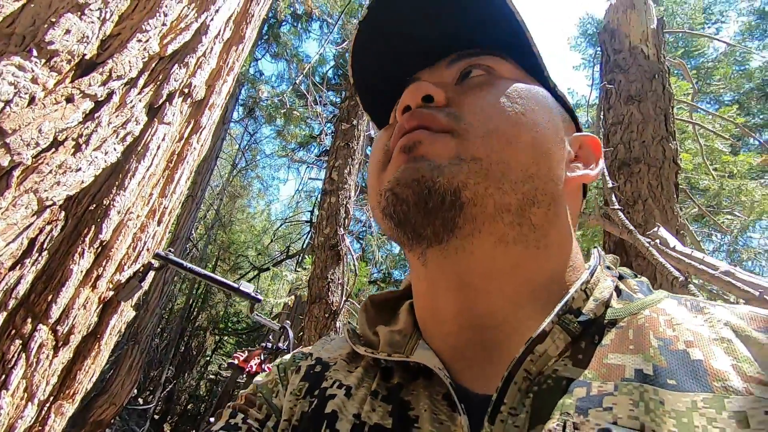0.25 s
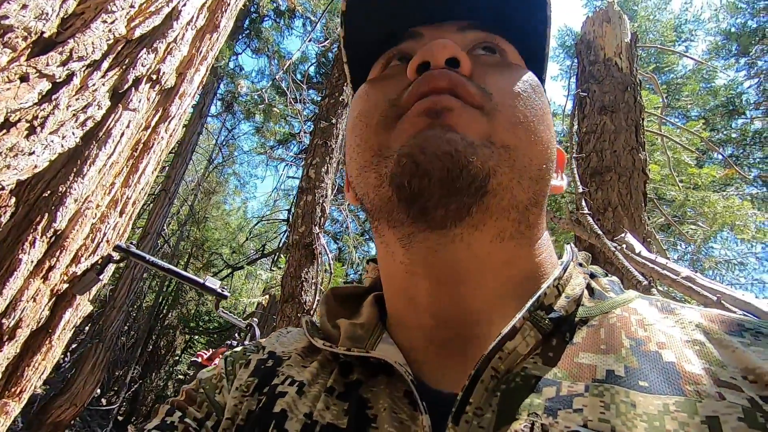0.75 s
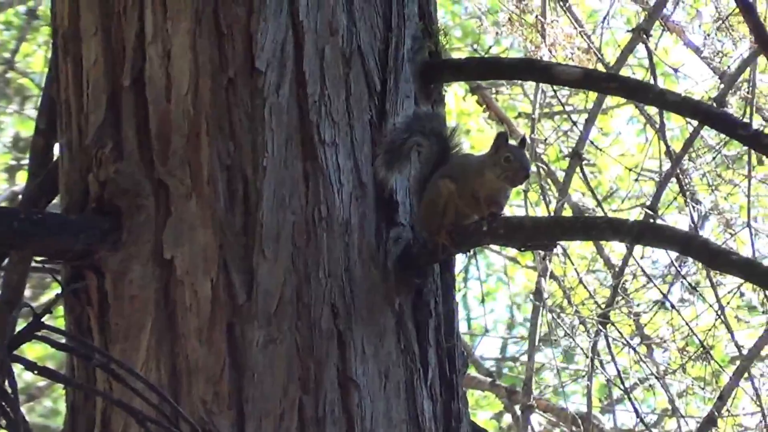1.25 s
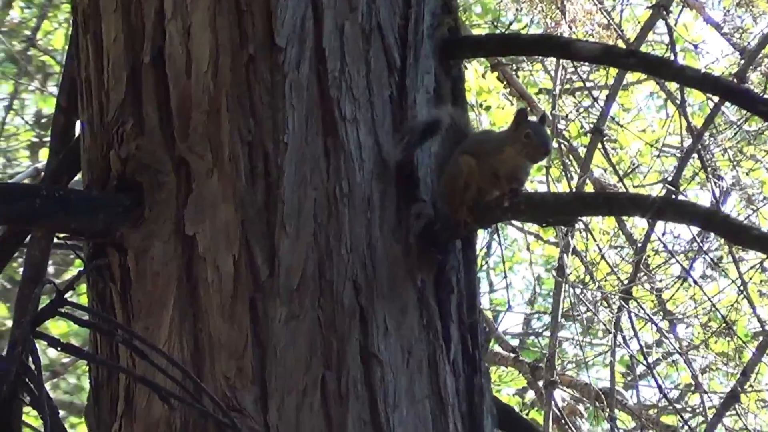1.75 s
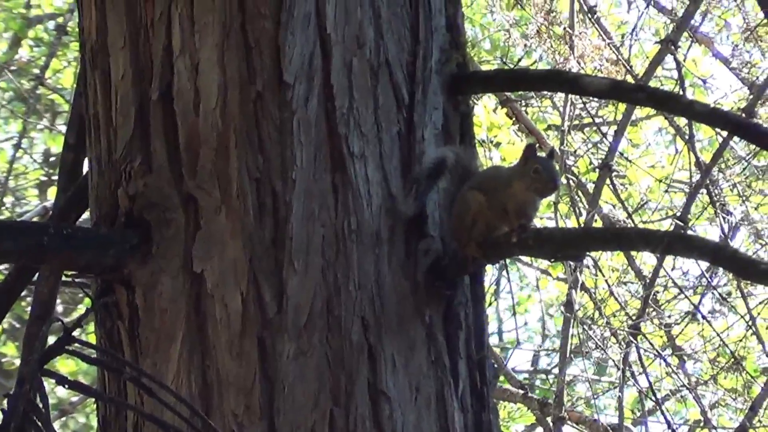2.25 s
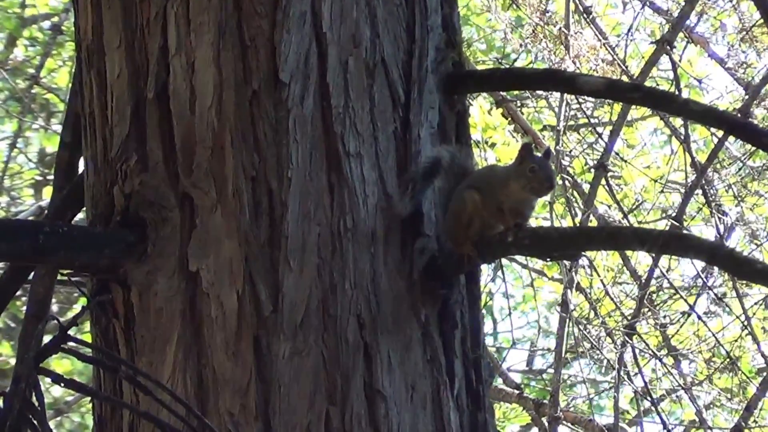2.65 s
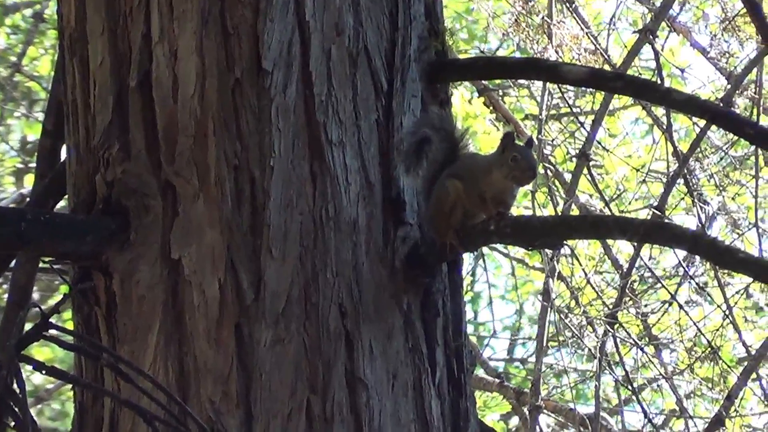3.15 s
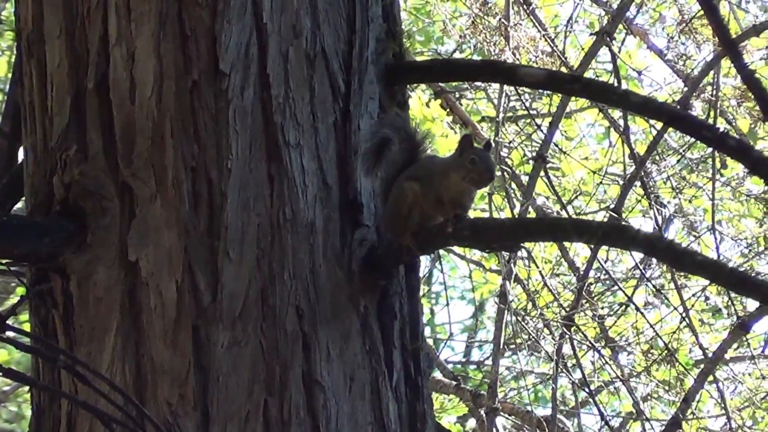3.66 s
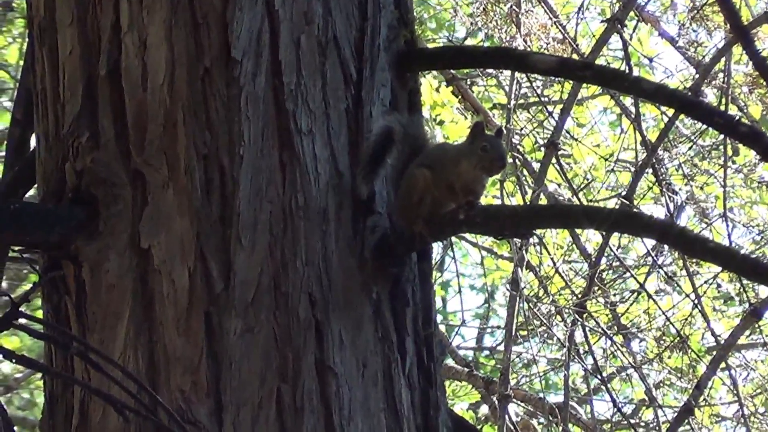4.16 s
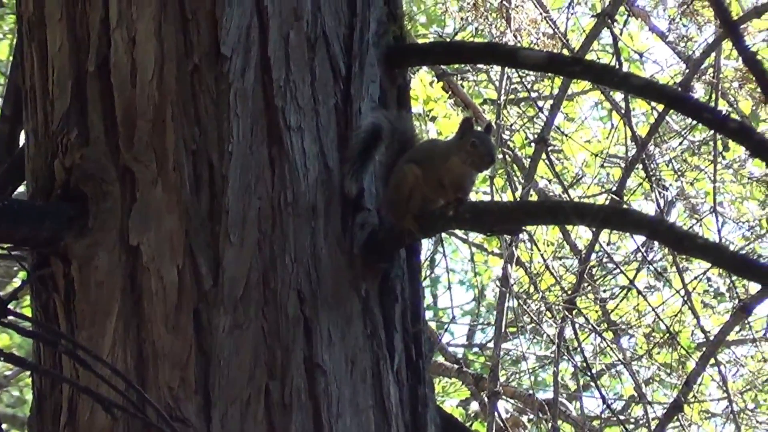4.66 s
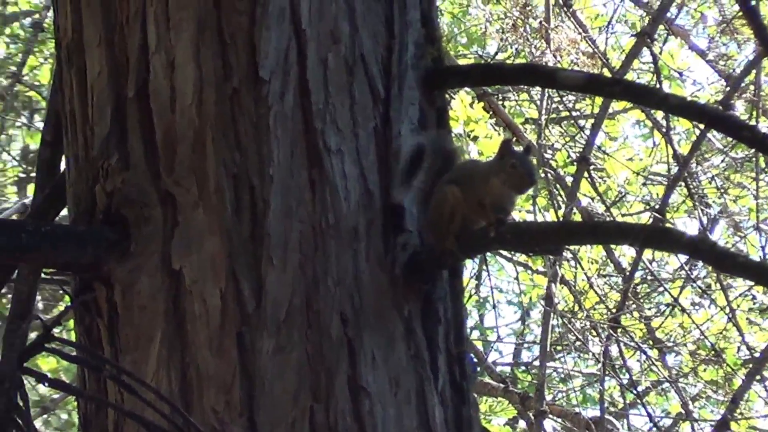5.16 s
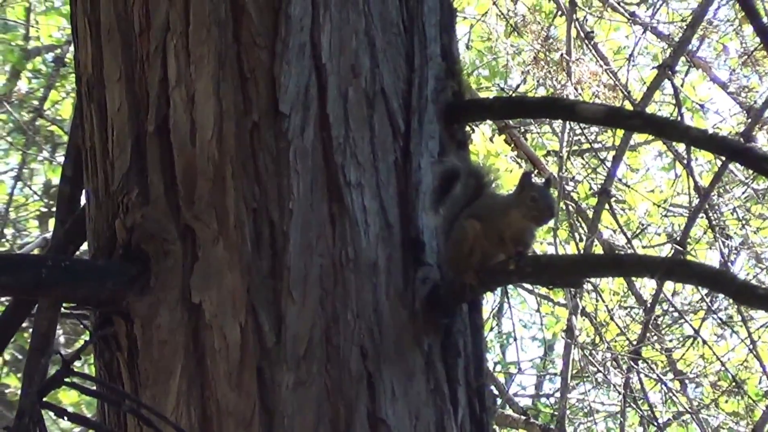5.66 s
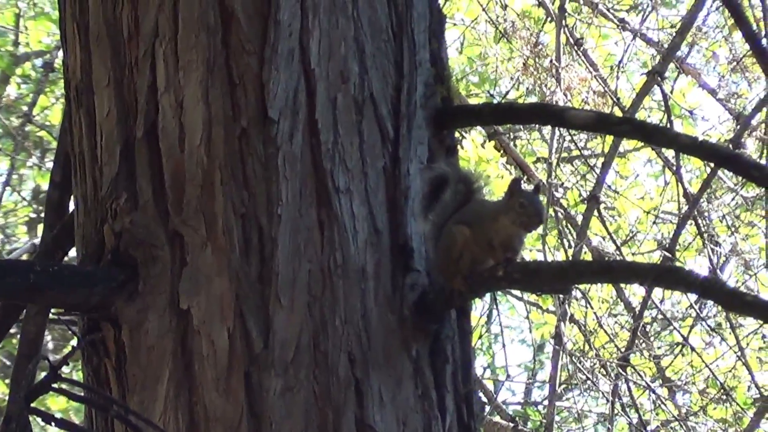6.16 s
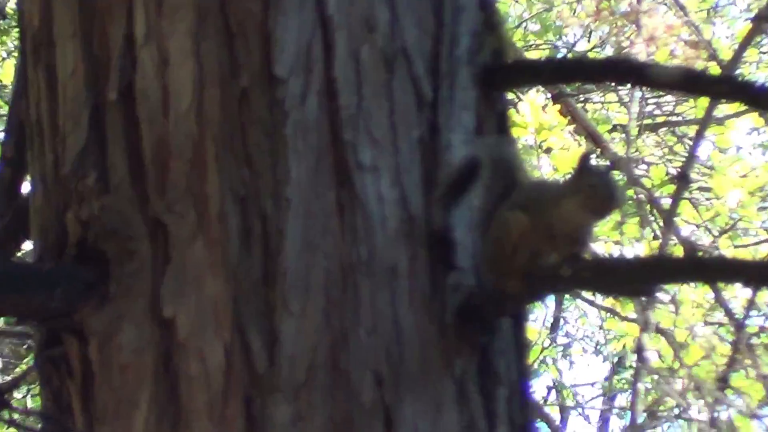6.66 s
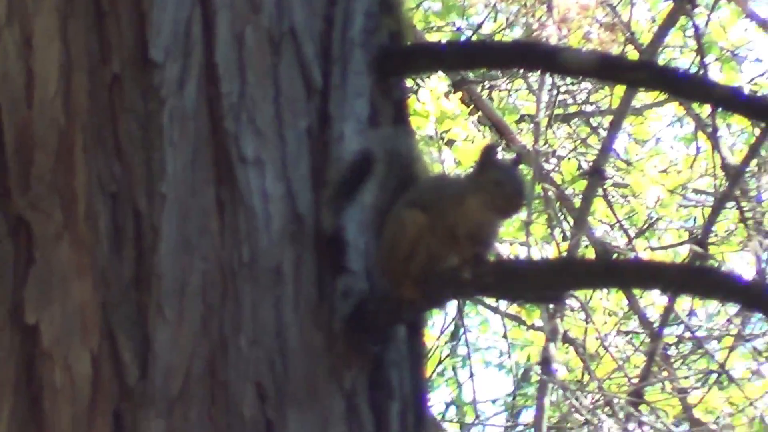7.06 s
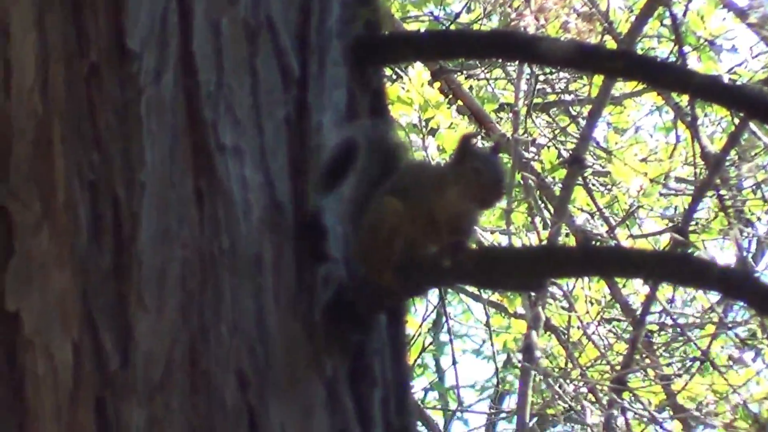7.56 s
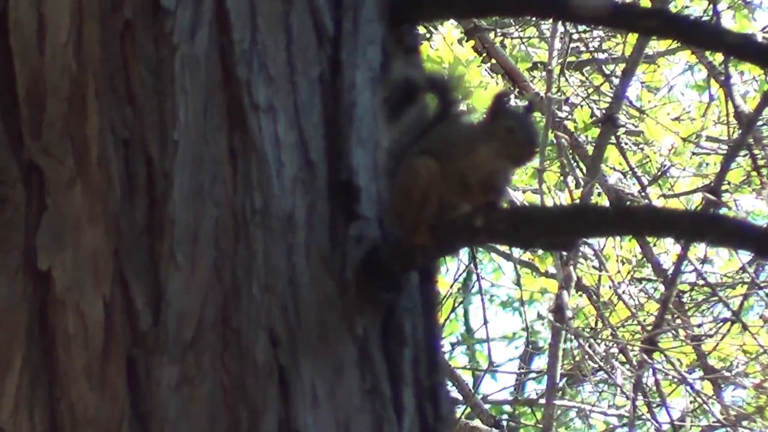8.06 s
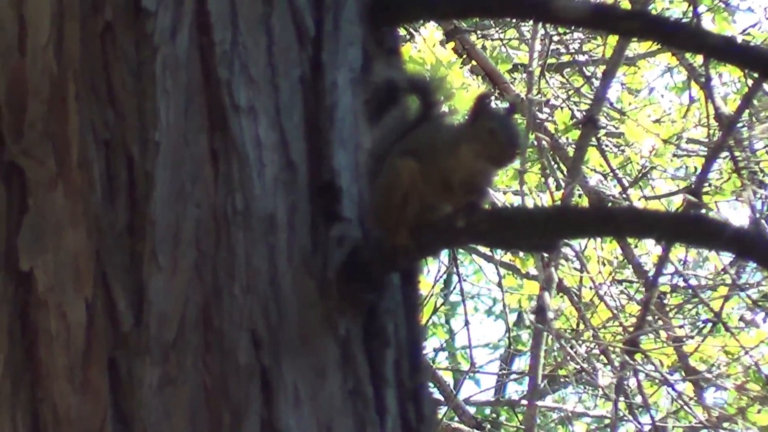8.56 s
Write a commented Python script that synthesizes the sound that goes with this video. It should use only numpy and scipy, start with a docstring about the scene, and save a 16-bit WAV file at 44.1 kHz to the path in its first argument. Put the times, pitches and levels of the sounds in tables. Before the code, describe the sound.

Very close, loud handling opens: cloth rubbing, plastic snaps and rapid stick-slip creaks in wide stereo. After about one second everything drops to quiet woods, with low airy murmur, electronic whine and a briefly fading hum. Evenly spaced squirrel chirps stand out, rasping at the onset, rising quickly and falling away into echo among trunks. Sparse high bird chips, light ticks and finger rubs on the camera surround them; hiss swells in the trees last.

```python
"""First a sleeve swishes over a hand-held camera and the grip snaps and creaks: cloth noise and
sudden slips ring the case. Then the scene cuts to a quiet forest of soft air noise, where the camera
whines thinly, hums briefly and ticks in the hand. A squirrel scolds with six sharp chirps built from
harmonics and breath noise, each sinking to a faint whistle. Small birds chip now and then on two
gliding tones. Close to the end a hiss swells in the trees."""
import sys
import numpy as np
from scipy import signal
from scipy.fft import next_fast_len
from scipy.io import wavfile

SR = 44100
rng = np.random.default_rng(int(sys.argv[2]) if len(sys.argv) > 2 else 0)


def file_out(sig):
    """Save sig as 16-bit WAV at sys.argv[1]."""
    # one column per channel
    cols = np.atleast_2d(sig).T
    # limit, then scale
    lim = np.clip(cols, -1, 1)
    pcm = np.round(lim * 32767).astype(np.int16)
    wavfile.write(sys.argv[1], SR, pcm)


N = 388521
TIME = np.arange(N) / SR
CUT_S = 1.075   # the handling gives way to the forest

# strokes of cloth over the case: [start t/s, end t/s, final level/dB, swell on the way/dB,
# brightness/dB, pressure/dB, catching/dB]
STROKES = [(0, 0.11, -31.5, -0.5, 0.5, 6.5, -1.5), (0.081, 0.213, -16, 14.5, 5, 5, 1.5),
           (0.229, 0.45, -21.5, 34, 0, 7.5, 1), (0.443, 0.698, -38.5, 1.5, -3, 6.5, 1),
           (0.707, 0.756, -27, -3.5, -6.5, -8, -0.5), (.77, 0.81, -53, -11, -16, -13, 0),
           (0.808, 1.03, -31.5, 10.5, -20, -13, 3.5), (1.015, 1.032, -18.5, 1, -11, -3, -4)]
# noise shape of the cloth: [f/Hz, level per Hz/dB]
CLOTH_SPECTRUM = [(250, -23), (450, -32), (750, -19.5), (1150, -1.5), (1500, 4), (1950, -1), (2500, -5.5),
                  (3300, -1.5), (4700, -7), (6500, -6.5), (9000, -10), (11000, -19.5), (15500, -22)]
# what rubbing excites in the case: [f/Hz, width f/Hz, level/dB]
RUB_MODES = [(1120, 460, 1), (1910, 460, 2)]
# the case flexing in the hand: [t/s, rumble level/dB]
FLEXING = [(0, -40.5), (.14, -59), (.235, -51.5), (.33, -55), (.46, -37), (.72, -31.5), (.8, -43.5),
           (.9, -31), (1.036, -23), (1.055, -76)]
# noise shape of that rumble: [f/Hz, level per Hz/dB]
RUMBLE_SPECTRUM = [(15, -37), (25, -1), (85, -3), (110, -11), (150, 4.5), (200, -1), (300, -11.5),
                   (460, -13), (700, -14.5), (910, -48)]
# stereo width of the handling: [f/Hz, side against mid level/dB]
HANDLING_SIDE = [(60, 2), (200, -9), (400, 2), (750, 6), (1400, 5.5), (2400, -8), (4400, -3), (8000, 1.5),
                 (15000, -7)]
# single snaps of the grip, before the case colours them: [t/s, peak level/dB, bass level/dB, treble level/dB]
SNAPS = [(.218, -9, -15, 9), (.362, -18.5, -6.5, -2), (.477, -12, -13.5, -7), (.677, -13, -22, -21),
         (.711, -16, -18, -0.5), (.763, -16, -7.5, -30), (.788, -25.5, -12, -40), (1.018, -12.5, -12, -28),
         (1.029, -5, -9.5, -4.5)]
# creaks, runs of nearly even slips: [start t/s, end t/s, gap t/s, first peak level/dB,
# growth per second/dB, bass level/dB, treble level/dB, centre f/Hz]
CREAKS = [(0.495, .525, 0.022, -24, -100, -5, -8, 1400), (0.547, .63, .0345, -17.5, 6, -13, -19, 1390),
          (.819, .92, .0192, -16, -42, -4.5, -32, 2700), (.933, 1.01, 0.022, -14.5, 6, -6, -45, 2700)]
# what a slip rings in the case: [f/Hz, width f/Hz, level/dB]
GRIP_MODES = [(142, 170, 4), (201.6, 140, 1.5), (640, 960, -5), (1150, 410, -2.5), (1660, 190, -1),
              (2510, 250, 1.5), (3030, 230, -1.5), (4070, 380, -4), (5000, 530, 2.5), (8800, 3300, 0.5)]
# noise shape of the forest air: [f/Hz, level per Hz/dB]
AIR_SPECTRUM = [(15, -42), (25, -12), (54, -2.5), (85, -2), (157, -0.5), (446, -2.5), (577, -5),
                (1130, -7.5), (2800, -13.5), (3640, -70), (6160, -120)]
# noise shape of the steady hiss: [f/Hz, level per Hz/dB]
HISS_SPECTRUM = [(1500, -7.5), (2800, 0), (6000, 0), (7500, -4), (11000, -4.5), (15500, -9)]
# stereo width of air, hiss and rubs: [f/Hz, side against mid level/dB]
AIR_SIDE = [(60, -16), (200, -3.5), (380, -0.5), (700, 3.5), (1300, 3), (2400, -1.5), (4400, -1.5),
            (8000, -4), (15000, -21)]
# whine of the camera once it has built up, before WHINE_DB: [f/Hz, nominal width f/Hz, level/dB]
WHINE_BANDS = [(3320, 79, -72.5), (3504, 134, -61), (4436, 120, -66), (4850, 52, -71.5), (5730, 110, -75.5)]
# steady tones of its electronics: [f/Hz, level/dB]
TONES = [(11832, -80), (15735, -67.5)]
# ticks and knocks of its body, before the final lift: [t/s, peak level/dB, bass level/dB, treble level/dB]
TICKS = [(1.261, -43, -19, -0.5), (2.006, -35.5, -15.5, -3), (2.26, -39, -35, -2),
         (2.47, -20.5, -12.5, -23), (3.116, -35.5, -14, -13.5), (3.374, -39, -30, -26),
         (3.428, -36.5, -53, -11.5), (3.93, -33, -22, -10), (4.207, -44, -26, 1),
         (4.46, -39.5, -22.5, -0.5), (5.177, -33.5, -26, -15), (5.226, -35, -7, -19.5),
         (5.809, -35, -12, -19), (5.97, -34.5, -13, -19), (6.961, -41, -5, -0.5), (7.16, -33.5, -21, -3),
         (7.701, -38.5, -29, -14), (8.025, -44.5, -27, -16)]
# what a tick or knock rings: [f/Hz, width f/Hz, level/dB]
BODY_MODES = [(131, 140, -19), (377, 57, -4), (549, 23, -2.5), (877, 54, -3.5), (1119, 78, -1.5),
              (1336, 130, -6), (1670, 120, -6), (2100, 380, 0), (2490, 170, -3.5), (3230, 1500, -4),
              (3970, 1120, -2), (6000, 680, -5), (7950, 3000, -13)]
# stereo width of the ticks: [f/Hz, side against mid level/dB]
BODY_SIDE = [(60, -7.5), (180, -11), (550, -10), (1650, -16), (4970, -10), (15000, -4)]
# soft rubs of the fingers: [middle t/s, half length t/s, level/dB]
RUBS = [(2.275, 0.063, -58), (3.155, .05, -58.5), (6.679, .25, -54.5)]
# noise shape of rubbing skin: [f/Hz, level per Hz/dB]
SKIN_SPECTRUM = [(200, -11), (420, -28), (560, 4), (760, -10), (1250, 5), (2000, -23), (3000, 2),
                 (6000, -9), (12000, -18)]
# squirrel chirps: [t/s, level/dB, pitch ratio, length ratio, brightness per octave/dB]
CHIRPS = [(1.544, -38.5, 0.98, 1.1, -1), (2.742, -38.5, 0.99, 1.08, -0.5), (3.902, -38, 0.99, 1.16, -0.8),
          (5.238, -38.5, 0.99, 1.02, 0.4), (6.439, -38.5, .997, 1.0, 0.1), (7.645, -39, 0.99, 1.09, -0.5)]
# the squirrel's throat and mouth: [f/Hz, level/dB]
THROAT = [(1400, 0.5), (2000, -1), (3700, -11.5), (4200, 2.5), (5400, -4), (5900, 3), (6350, -15),
          (7700, -5), (8500, -16.5), (9600, 4.5), (10400, -3), (11300, -15), (12300, -16), (14500, -25)]
# bird chips, near and far: [t/s, level/dB, pitch ratio]
CHIPS = [(2.294, -41, 1.07), (3.14, -53, 1.15), (4.87, -57, 1.2), (5.72, -55.5, 1.13), (7.361, -54, 1.0),
         (8.581, -39.5, 1.01)]
# course of one chip: [t/s after its start, pitch f/Hz before the ratio, level/dB]
CHIP_SHAPE = [(0, 5600, -15), (.006, 6690, -1.5), (.014, 7130, -13.5), (.025, 7150, -12), (.045, 7070, -28)]
# noise shape of the swelling hiss: [f/Hz, level per Hz/dB]
SWELL_SPECTRUM = [(1000, -12), (2300, -2.5), (4000, -1), (5000, 3.5), (7000, -19), (11000, -15)]

# cloth and grip
STROKE_ATTACK_S, STROKE_RELEASE_DB_PER_S, CATCHES_PER_S = 0.00078, 1800, 240
BRIGHTENING = 0.096   # dB of extra fibre hiss for each dB that a stroke swells
SNAP_CENTRE_HZ = 1520   # where the case answers a snap most strongly
SLIP_JITTER_S, SLIP_SPREAD_DB = 0.0004, 1.5
# forest air
AIR_DB, HISS_DB = -59.5, -61
# camera
WHINE_DB, WHINE_SETTLE_S = -0.47, 0.81   # the whine builds up after the cut
SCAN_PER_S, SCAN_GAP_SHARE = 59.94, 0.07   # the tones drop out briefly on every picture scan
HUM_HZ, HUM_DB, HUM_S = 113, -67.5, 1   # a low hum dies away after the cut
# the skin catches during the longest rub
CRACKLE_COUNT, CRACKLE_DB, CRACKLE_BASS_DB, CRACKLE_TREBLE_DB = 9, -44, -8.5, -11
# ticks with more treble ring at a higher centre; this is the centre at 0 dB treble
TICK_CENTRE_HZ, TREBLE_DB_PER_OCTAVE = 2800, 12.5
# squirrel, before each chirp's own ratios: the pitch climbs to the top, then relaxes after the break
START_HZ, TOP_HZ, REST_HZ = 1787, 2100, 1290
CLIMB_S, CLIMB_CURVE, BREAK_S, RELAX_S = 0.037, 0.659, 0.039, 0.09
# effort opens fast, sags while the squeak is held, collapses at the break and leaves a whistle
ATTACK_S, ATTACK_DB, SAG_DB_PER_S, COLLAPSE_DB_PER_S = 0.013, 12, 143, 650
WHISTLE_DB, WHISTLE_S, WHISTLE_FADE_DB_PER_S = -23, 0.182, 600
RASP_DB, RASP_CLEARS_S, HELD_RASP_DB = 4, 0.0037, -14   # breathy at the onset, nearly clean after it
# swelling hiss in the trees, and the top of the recorded range
SWELL_S, SWELL_RISE_S, SWELL_DB = 8.58, 0.074, -53
CUTOFF_HZ = 15800


def from_db(db):
    """Turn decibels into gain."""
    return 10 ** (np.asarray(db) / 20)


def rms_one(x):
    """Scale a sound to an average (rms) strength of 1."""
    return x / np.sqrt(np.mean(x ** 2) + 1e-20)


def along(rows, t):
    """Read each column of a curve at times t."""
    s, *columns = np.transpose(rows)
    return [np.interp(t, s, c) for c in columns]


def at_hz(points, hz):
    """Read a spectrum on a log-frequency axis, as ears space pitch."""
    point_hz, level_db = np.array(points).T
    return np.interp(np.log(hz), np.log(point_hz), level_db)


def add(out, s, sound):
    """Mix a sound in at time s."""
    i = int(s * SR)
    out[..., i:i + sound.shape[-1]] += sound[..., :N - i]


def wobble(t, rate):
    """Random wandering around 0 with a spread of roughly 1, given rate new targets a second."""
    return np.interp(t * rate, np.arange(8192), rng.standard_normal(8192))


def resonate(x, hz, width):
    """Ring like a struck object: a two-pole resonance with gain about 1 at its peak."""
    r = np.exp(-np.pi * abs(width) / SR)
    feed = np.array([1, 0, -1]) * (1 - r * r) / 2
    feedback = [1, -2 * r * np.cos(2 * np.pi * hz / SR), r * r]
    return signal.lfilter(feed, feedback, x + 1e-18)


def butter(x, order, hz, kind="low"):
    """Keep only part of the frequency range, with smooth edges."""
    return signal.sosfilt(signal.butter(order, hz, kind, fs=SR, output="sos"), x)


def sine(hz):
    """A steady pure tone of rms 1."""
    return np.sqrt(2) * np.sin(2 * np.pi * hz * TIME)


def stereo(pair, side_db):
    """Make left and right from a mid and a side signal."""
    side = from_db(side_db) * pair[1]
    return np.array([pair[0] + side, pair[0] - side])


def noise(spectrum, sides, patchy_db):
    """Stereo noise in narrow bands, each flickering on its own; its mid has rms 1."""
    edges = np.geomspace(22, 17000, 31)
    white, out = rng.standard_normal((2, 2, N)), 0
    for k, (low, high) in enumerate(zip(edges, edges[1:])):
        if high < spectrum[0][0] or low > spectrum[-1][0]:
            continue
        hz = np.sqrt(low * high)
        pair = butter(white[k % 2], 2, [low, high], "band")
        level_db = at_hz(spectrum, hz) + patchy_db * wobble(TIME, 30)
        out = out + stereo(pair, at_hz(sides, hz)) * from_db(level_db)
    return rms_one(out) * np.sqrt(np.mean(out ** 2) / np.mean(out.mean(0) ** 2))


def knocks(events, modes, sides, grit_s, grit_db, bass_hz, treble_hz, bass_db, treble_db, focus_db):
    """Each contact is a click with a gritty wake that rings the modes; where it lands sets its colour."""
    out, t = np.zeros((2, N)), np.arange(SR // 10) / SR
    for s, peak_db, bass, treble, centre in events:
        colour = [(bass_hz, bass + bass_db), (np.sqrt(2) * bass_hz, 0),
                  (treble_hz / 2, 0), (treble_hz, treble + treble_db)]
        core, sound = 0, 0
        for k, (hz, width, db) in enumerate(modes):
            force = from_db(grit_db) * rng.standard_normal((2, len(t))) * np.exp(-t / grit_s)
            force[:, 0] += (-1) ** k   # the click itself
            rings = resonate(resonate(force, hz, hz), hz, width)
            octaves_off = min(abs(np.log2(hz / centre)), 1)
            pair = from_db(db - focus_db * octaves_off) * np.array([rms_one(ring) for ring in rings])
            pair[1] *= rng.choice([-1, 1])   # a mode may push either port harder
            core = core + pair[0] * (bass_hz < hz < treble_hz)
            sound = sound + stereo(pair, at_hz(sides, hz)) * from_db(at_hz(colour, hz))
        # the peak level refers to the modes between bass and treble
        add(out, s, sound * from_db(peak_db) / np.abs(core).max())
    return out


def handling(fibre_hz=4200):
    """Cloth fibres catch unevenly and drive the case, which rumbles as it flexes; the grip judders."""
    level, hiss, pressure = cloth_strokes()
    cloth = from_db(-2.5 + 1.3 * wobble(TIME, 700)) * noise(CLOTH_SPECTRUM, HANDLING_SIDE, patchy_db=3.0)
    body = butter(cloth, 3, fibre_hz)
    fibres = butter(cloth, 3, fibre_hz, "high")
    driven = sum((-1) ** k * from_db(db) * resonate(body, hz, width)
                 for k, (hz, width, db) in enumerate(RUB_MODES))
    # the case answers a quarter cycle behind the cloth
    driven = signal.hilbert(driven, next_fast_len(N)).imag[:, :N]
    swish = level * body + hiss * fibres + pressure * driven
    rumble = from_db(along(FLEXING, TIME)[0]) * noise(RUMBLE_SPECTRUM, HANDLING_SIDE, patchy_db=3.5)
    slips = knocks(grip_slips(), GRIP_MODES, HANDLING_SIDE, grit_s=0.0021, grit_db=-10.5, bass_hz=340,
                   treble_hz=7930, bass_db=11.5, treble_db=-3.5, focus_db=2.5)
    return case(swish + rumble + slips)


def cloth_strokes():
    """Gains of the cloth's body, fibre hiss and drive on the case; strokes swell or fade, then lift off."""
    power = np.zeros((3, N))
    for start, end, level_db, swell_db, bright_db, press_db, catch_db in STROKES:
        below_db = swell_db * np.clip((end - TIME) / (end - start), 0, 1)
        release_db = STROKE_RELEASE_DB_PER_S * np.clip(TIME - end, 0, 1 / 5)
        gain = from_db(level_db - below_db - release_db)
        gain = gain * from_db(catch_db * wobble(TIME, CATCHES_PER_S))
        gain = gain * np.clip((TIME - start) / STROKE_ATTACK_S, 0, 1)
        hiss = gain * from_db(bright_db - BRIGHTENING * below_db)
        power += np.array([gain, hiss, gain * from_db(press_db)]) ** 2
    return np.sqrt(power)


def grip_slips():
    """Single snaps, and runs of stick and slip at a nearly even pace."""
    slips = [(*snap, SNAP_CENTRE_HZ) for snap in SNAPS]
    for start, end, gap_s, peak_db, growth_db, *colour in CREAKS:
        chance = rng.standard_normal(size=(16, 2))
        for s, (late, strong) in zip(np.arange(start, end, gap_s), chance):
            slip_db = peak_db + growth_db * (s - start) + SLIP_SPREAD_DB * strong
            slips.append((s + SLIP_JITTER_S * late, slip_db, *colour))
    return slips


def case(x, rock_hz=1160, rock_width=190, rock_db=6, shell_db=-6,
         port_hz=7800, port_width=1100, port_db=3, top_hz=10800):
    """The case rocks between its two ports, mostly in opposite phase; the left adds a high resonance."""
    rocking = from_db(rock_db) * (x[0] - x[1]) / 2 * np.array([[1], [-1]])
    shell = from_db(shell_db) * x.mean(0)
    x = x + resonate(rocking + shell, rock_hz, rock_width)
    x = x + from_db(port_db) * resonate(x, port_hz, port_width) * np.array([[1], [0]])
    return butter(x, 3, top_hz)


def still_air():
    """Low forest air and a steady hiss, both made of gently flickering noise bands."""
    air = from_db(AIR_DB) * noise(AIR_SPECTRUM, AIR_SIDE, patchy_db=2.0)
    return air + from_db(HISS_DB) * noise(HISS_SPECTRUM, AIR_SIDE, patchy_db=0.8)


def camera():
    """Narrow wavering whine bands, two thin tones, a low hum, and the ticks and rubs of the hand."""
    return stereo(camera_whine(), side_db=-26) + camera_tones() + camera_hum() + camera_ticks() + finger_rubs()


def camera_whine():
    """Noise rung twice through narrow resonances wavers like a whine."""
    whine = 0
    for hz, width, db in WHINE_BANDS:
        once = resonate(rng.standard_normal((2, N)), hz, width * 2)
        whine = whine + from_db(db) * rms_one(resonate(once, hz, width * 2))
    # the gain starts at one half and rises smoothly towards 1
    build_up = 1 - np.exp(-np.maximum(TIME - CUT_S, 0) / WHINE_SETTLE_S) / 2
    return whine * from_db(WHINE_DB) * build_up


def camera_tones():
    """Thin high tones of the electronics, silenced briefly on every picture scan."""
    tones = sum(from_db(db) * sine(hz) for hz, db in TONES)
    return tones * (TIME * SCAN_PER_S % 1 > SCAN_GAP_SHARE)


def camera_hum():
    """A low pure tone that dies away along a bell curve."""
    return from_db(HUM_DB) * sine(HUM_HZ) * np.exp(-((TIME - CUT_S) / HUM_S) ** 2)


def camera_ticks():
    """Small contacts and skin crackles ring the camera body, and the forest answers."""
    middle, half, _ = RUBS[-1]
    crackles = [(middle + half * u, CRACKLE_DB, CRACKLE_BASS_DB, CRACKLE_TREBLE_DB)
                for u in rng.uniform(-1, 1, size=CRACKLE_COUNT)]
    contacts = [(*tick, TICK_CENTRE_HZ * 2 ** (tick[-1] / TREBLE_DB_PER_OCTAVE))
                for tick in TICKS + crackles]
    ticks = knocks(contacts, BODY_MODES, BODY_SIDE, grit_s=0.0026, grit_db=-12, bass_hz=648,
                   treble_hz=4830, bass_db=14.0, treble_db=7.0, focus_db=5.0)
    return from_db(2.0) * forest(ticks, near_db=-19, far_db=-7, far_t60=0.42, dull_hz=850)


def finger_rubs():
    """Skin noise swells and fades with each rub and catches unevenly."""
    catching = from_db(2.5 * wobble(TIME, 110))
    rubbing = sum(from_db(db) * np.exp(-((TIME - s) / half_s) ** 2) for s, half_s, db in RUBS)
    return rubbing * catching * noise(SKIN_SPECTRUM, AIR_SIDE, patchy_db=5.0)


def forest(x, near_db, far_db, far_t60, dull_hz, near_t60=0.057, first_s=0.0068, leaves_hz=7000):
    """Near trunks scatter sound almost at once, farther ones return a longer tail; leaves dull the echoes."""
    t = np.arange(SR) / SR
    near, far = rng.standard_normal((2, 2, SR)) * (t > first_s)
    # t60 is the time in seconds to fade by 60 dB
    near = from_db(near_db) * rms_one(near * from_db(-60 * t / near_t60))
    far = from_db(far_db) * rms_one(far * from_db(-60 * t / far_t60))
    echoes = butter(near + butter(far, 2, dull_hz), 1, leaves_hz)
    echoes = stereo(echoes, side_db=-9.0) / np.sqrt(SR)
    return x + signal.fftconvolve(np.atleast_2d(x), echoes, axes=1)[:, :N]


def squirrel(jitter=0.0073, shimmer_db=1.5, pure_below_db=-7, dulling=1.4, falter_db=1.5):
    """A rasping attack opens into a rising squeak; as effort fades it thins to a faltering whistle."""
    out, t = np.zeros(N), np.arange(SR // 4) / SR
    for s, level_db, pitch, length, bright_db in CHIRPS:
        hz, effort, rasp = chirp_course(t / length)
        hz = hz * pitch * (1 + jitter * wobble(t, 397))
        phase = 2 * np.pi * np.cumsum(hz) / SR
        slack = dulling * np.minimum(effort - pure_below_db, 0)
        # air escapes in a puff on every cycle
        puffs = rng.standard_normal(len(t)) * (1 + np.cos(phase))
        voice = rasp * from_db(slack) * butter(puffs, 1, [3000, 14000], "band")
        for k in range(1, 8):   # harmonics; weak effort dulls the upper ones
            db = at_hz(THROAT, k * hz) + (bright_db + slack / 2) * np.log2(k) + shimmer_db * wobble(t, 199)
            voice = voice - np.sqrt(2) * np.cos(k * phase) * from_db(db)
        falter = falter_db * np.minimum(effort / WHISTLE_DB, 1) * wobble(t, 122)
        add(out, s, voice * from_db(level_db + effort + falter) * np.minimum(t / 0.0021, 1))
    return out


def chirp_course(t):
    """Pitch (Hz), effort (dB) and rasp (gain) at time t into a chirp."""
    after_break = np.maximum(t - BREAK_S, 0)
    climb = START_HZ + (TOP_HZ - START_HZ) * np.minimum(t / CLIMB_S, 1) ** CLIMB_CURVE
    hz = REST_HZ + (climb - REST_HZ) * np.exp(-after_break / RELAX_S)
    opening = -ATTACK_DB * np.maximum(1 - t / ATTACK_S, 0)
    sag = SAG_DB_PER_S * np.maximum(t - ATTACK_S, 0)
    squeak = opening - sag - COLLAPSE_DB_PER_S * after_break
    whistle = WHISTLE_DB - WHISTLE_FADE_DB_PER_S * np.maximum(t - WHISTLE_S, 0)
    rasp = from_db(RASP_DB) * np.exp(-t / RASP_CLEARS_S) + from_db(HELD_RASP_DB)
    return hz, np.maximum(squeak, whistle), rasp


def bird(upper_ratio=1.13, upper_db=-6, jitter=0.015):
    """A quick rough upward flick, sung by both sides of the bird's voice box (syrinx)."""
    out, t = np.zeros(N), np.arange(int(CHIP_SHAPE[-1][0] * SR)) / SR
    hz, db = along(CHIP_SHAPE, t)
    for s, level_db, pitch in CHIPS:
        rough_hz = hz * pitch * (1 + jitter * wobble(t, 1460))
        phase = 2 * np.pi * np.cumsum(rough_hz) / SR
        voices = np.sin(phase) + from_db(upper_db) * np.sin(upper_ratio * phase)
        add(out, s, voices * from_db(level_db + db))
    return out


def tree_swell():
    """A patchy hiss in the trees that rises quickly and then holds."""
    rise = np.clip((TIME - SWELL_S) / SWELL_RISE_S, 0, 1)
    return from_db(SWELL_DB) * rise * noise(SWELL_SPECTRUM, AIR_SIDE, patchy_db=2.5)


def scene():
    """Close handling, a cut, then the animals over still forest air."""
    scolding = forest(squirrel(), near_db=-5.0, far_db=-6.5, far_t60=0.39, dull_hz=8500)
    chips = forest(bird(), near_db=0.5, far_db=0.5, far_t60=0.94, dull_hz=9000)
    quiet_forest = still_air() + camera() + scolding + chips + tree_swell()
    after_cut = np.clip((TIME - CUT_S) / 0.028, 0, 1)   # a very short crossfade
    return handling() * (1 - after_cut) + quiet_forest * after_cut


def record(dry):
    """Peaks stop at full scale and the top of the range is cut steeply."""
    top_cut = signal.ellip(12, 0.1, 80, CUTOFF_HZ, fs=SR, output="sos")
    return signal.sosfilt(top_cut, np.clip(dry, -1, 1))


dry = scene()
out = record(dry)
file_out(out)
```